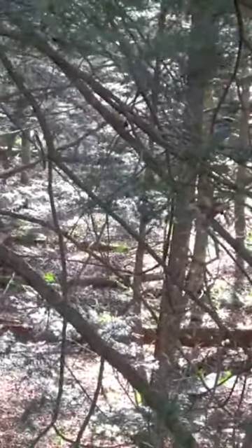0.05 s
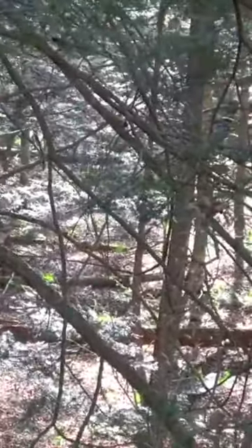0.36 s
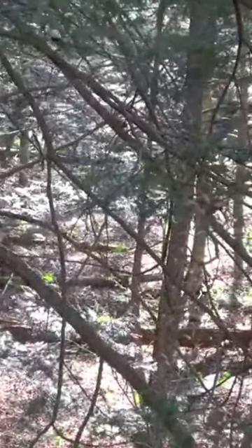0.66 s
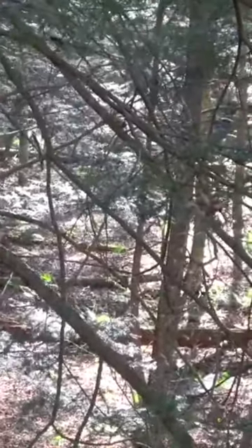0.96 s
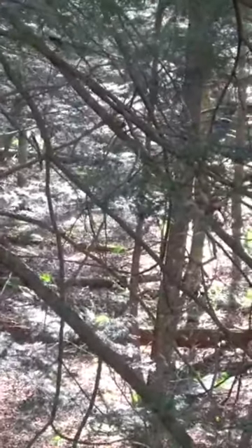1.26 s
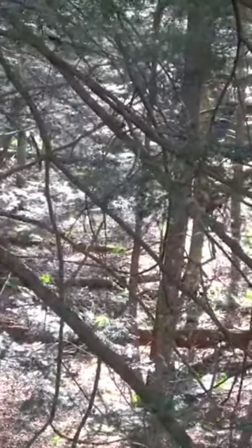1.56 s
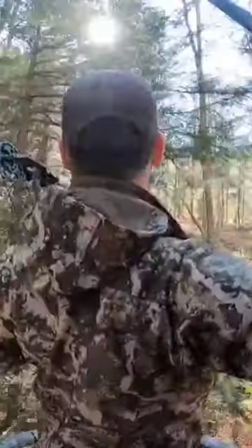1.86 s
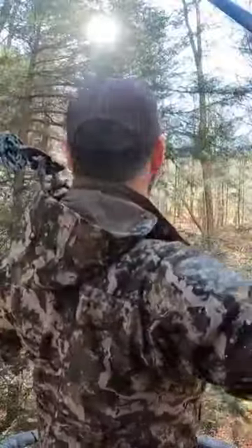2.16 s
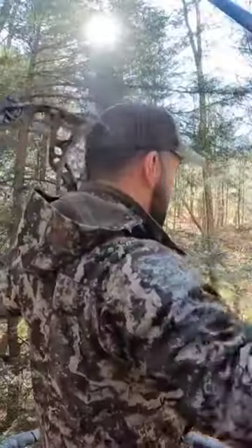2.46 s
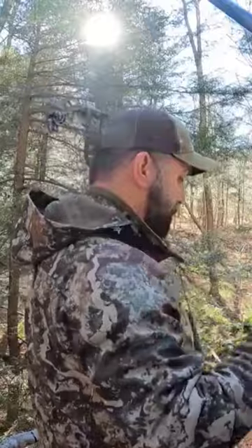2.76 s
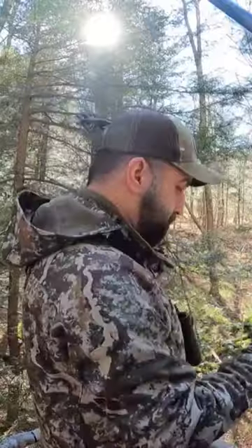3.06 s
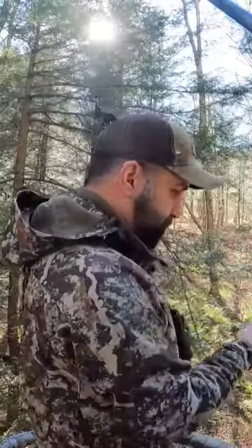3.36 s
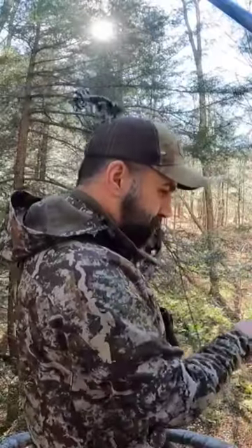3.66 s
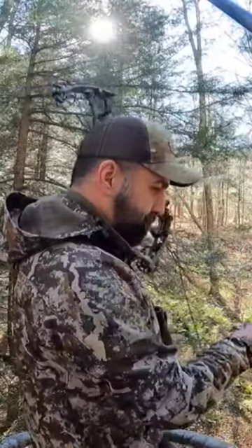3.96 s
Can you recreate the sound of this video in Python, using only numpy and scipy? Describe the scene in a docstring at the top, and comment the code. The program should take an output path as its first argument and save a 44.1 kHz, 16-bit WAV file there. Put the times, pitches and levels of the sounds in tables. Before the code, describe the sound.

Wind rumbles on the microphone throughout, over a soft hiss of conifers. Dry twigs tick nearby at first, then a stiff jacket rustles and gear clicks close by, ending in a brief clatter with dull bumps.

```python
"""A conifer wood, one microphone out in the wind. Gusts buffet it throughout, over the hiss of the
needles, and in the first two seconds dry twigs tick nearby. Close by, a man shifts in a stiff jacket
and something rubs with a faint whistle. After one thin high note his gear starts to click, and the
hiss cuts out for an instant now and then. Near the end the gear clatters with a gritty scrape and
dull bumps through the microphone mount, and the recorder's limiter ducks the background."""
import sys
import numpy as np
from scipy import signal
from scipy.io import wavfile
from scipy.ndimage import uniform_filter1d

SR = 44100
rng = np.random.default_rng(int(sys.argv[2]) if len(sys.argv) > 2 else 0)


def store_wav(level_fs):
    """Save 16-bit WAV to argv[1]."""
    pcm = np.round(np.clip(np.atleast_2d(level_fs), -1, 1) * 32767)
    wavfile.write(sys.argv[1], SR, pcm.T.astype(np.int16))


N = 176400
TIME = np.arange(N) / SR

# Strength of the breeze in the trees: time_s, level_db
BREEZE = [(0, -39.5), (.3, -40.5), (.43, -41.5), (.6, -40), (.72, -42.5), (.9, -38.5), (1.0, -43),
          (1.12, -45), (1.24, -42.5), (1.33, -47), (1.41, -42.5), (1.6, -41.5), (1.72, -41.5), (2.1, -43),
          (2.4, -43), (2.8, -41), (3.25, -42.5), (3.7, -43.5), (3.85, -44.5), (3.96, -49)]


def from_db(db):
    """Decibels to gain."""
    return 10 ** (np.asarray(db) / 20)


def rms_one(x):
    """Scale to rms 1."""
    return x / np.sqrt(np.mean(x ** 2) + 1e-20)


def level(rows):
    """Gain over time from rows of time_s, level_db."""
    return from_db(np.interp(TIME, *np.transpose(rows)))


def drift(rate_hz):
    """Smooth random wander of rms 1, mostly slower than rate_hz."""
    step, settle = 40, 2000
    pole = np.exp(-2 * np.pi * rate_hz * step / SR)
    white = rng.standard_normal(N // step + settle + 2)
    slow = signal.lfilter([1], [1, -2 * pole, pole * pole], white)[settle:]
    return np.interp(np.arange(N) / step, np.arange(len(slow)), rms_one(slow))


def lowpass(x, hz, order=2):
    """Roll off the highs above hz."""
    return signal.sosfilt(signal.butter(order, hz, fs=SR, output="sos"), x)


def shelf(x, treble_db):
    """Raise or lower the treble above 6 kHz."""
    dull = lowpass(x, 6000, order=1)
    return dull + from_db(treble_db) * (x - dull)


def noise(spectrum, flicker_db=0, flicker_hz=6.3):
    """Overlapping bands of noise, each flickering on its own by flicker_db; rms 1."""
    hz, db = np.transpose(spectrum)
    edges = np.r_[np.geomspace(2.5, 5000, 40), np.arange(6000, 17000, 1000)]
    white = rng.standard_normal((2, N + SR))
    out = 0
    for k, (low, high) in enumerate(zip(edges, edges[1:])):
        if high > hz[0] and low < hz[-1]:
            bandpass = signal.butter(2, [low, high], "band", fs=SR, output="sos")
            band = signal.sosfilt(bandpass, white[k % 2])[SR:]
            band_db = np.interp(np.log(low * high) / 2, np.log(hz), db)
            out = out + band * from_db(band_db + flicker_db * drift(flicker_hz))
    return rms_one(out)


def swell(middle_s, half_s):
    """A bell-shaped envelope, down to 1/e at half_s either side of its middle."""
    return np.exp(-np.minimum(((TIME - middle_s) / half_s) ** 2, 100))


def contact(modes, crack_db, crack_s, crack_hz, vary_db):
    """One blow: a short broad crack, and each mode ringing at a chance strength, a little off pitch."""
    t = TIME[:8192]
    crack = from_db(crack_db) * lowpass(rng.standard_normal(len(t)) * np.exp(-t / crack_s), crack_hz)
    detune = 1 + .006 * rng.standard_normal(len(modes))
    ring = 0
    for k, (hz, db, t60_s) in enumerate(modes):
        tone = (-1) ** k * np.sin(2 * np.pi * hz * detune[k] * t)
        ring = ring + from_db(db + vary_db * rng.normal() - 60 * t / t60_s) * tone
    return crack + ring


def strike(hits, modes, **touch):
    """Blows on one body, from rows of start_s, level_db and optionally treble_db, pitch_ratio."""
    out = np.zeros(N + SR)
    for start_s, level_db, *colour in hits:
        treble_db, pitch_ratio = colour + [0, 1][len(colour):]
        tuned = [(hz * pitch_ratio, db, t60_s) for hz, db, t60_s in modes]
        blow = shelf(contact(tuned, **touch), treble_db)
        start = int(start_s * SR)
        out[start:start + len(blow)] += from_db(level_db) * blow
    return out[:N]


def wind():
    """Gusts right on the microphone: big slow eddies rumble, smaller ones flutter above them."""
    # Strength of the big eddies: time_s, relative_db
    gusts = [(0, -23.5), (.2, -11.5), (.38, -29), (.55, -18.5), (.7, -22), (.92, -15), (1.05, -20),
             (1.2, -17), (1.4, -17.5), (1.55, -18), (1.75, -21), (1.95, -24.5), (2.15, -20), (2.35, -16.5),
             (2.55, -23.5), (2.67, -15), (2.9, -16), (3.15, -18.5), (3.4, -17.5), (3.65, -21), (3.95, -13),
             (4, -19.5)]
    # Strength of the small eddies: time_s, level_db
    buffets = [(0, -28), (.2, -30.5), (.42, -33), (.55, -32.5), (.68, -34), (.78, -24.5), (.93, -23.5),
               (1.03, -35), (1.25, -28.5), (1.55, -32), (1.9, -33.5), (2.05, -37), (2.2, -34),
               (2.35, -37.5), (2.55, -26.5), (2.75, -32), (3.05, -27.5), (3.4, -40), (3.55, -47),
               (3.75, -29.5), (3.86, -23), (4, -23)]
    # Spectrum of the big eddies: freq_hz, density_db
    rumble_spectrum = [(3, -5), (5, -1.5), (11, -0.5), (17, 1.5), (25, -6.5), (35, -14.5), (50, -22),
                       (70, -34.5), (110, -43)]
    # Spectrum of the small eddies: freq_hz, density_db
    flutter_spectrum = [(30, -3), (50, 2.5), (70, -3), (100, -12.5), (125, -14), (160, -18), (250, -33.5),
                        (400, -39), (900, -72)]
    rumble = noise(rumble_spectrum)
    flutter = noise(flutter_spectrum, flicker_db=3, flicker_hz=25.7)
    for eddies in (rumble, flutter):  # evened out, so the gusts and buffets set the strength
        eddies /= np.sqrt(uniform_filter1d(eddies ** 2, size=8000))
    return from_db(5.5) * level(gusts) * rumble + level(buffets) * flutter


def trees():
    """Air streams through the needles all around with a smooth, slightly wavering hiss."""
    # Spectrum of the hiss: freq_hz, density_db
    needle_spectrum = [(120, 7), (220, 8), (350, 4.5), (500, 3.5), (850, -0.5), (1250, -0.5), (2000, -5),
                       (4000, -6.5), (6300, -8), (8500, -12), (10000, -18), (12500, -22), (15000, -27)]
    waver = from_db(.6 * drift(40))
    hiss = noise(needle_spectrum, flicker_db=1.6, flicker_hz=30)
    return waver * level(BREEZE) * hiss


def crackle(ticks_per_s=120, level_db=-57):
    """Tiny ticks of dry needles and leaves, half sunk in the hiss and denser in a stronger breeze."""
    breeze = level(BREEZE)
    onsets = rng.random(N) < ticks_per_s * breeze / breeze.mean() / SR
    sizes = onsets * from_db(4 * np.minimum(rng.exponential(1, N), 2.5))
    pitches_hz = np.geomspace(3000, 9000, 10)
    pitch_index = rng.integers(0, len(pitches_hz), N)
    t = TIME[:600]
    ticks = 0
    for k, hz in enumerate(pitches_hz):
        ring = np.sin(2 * np.pi * hz * t) * np.exp(-t * hz / 2)
        ticks = ticks + signal.oaconvolve(sizes * (pitch_index == k), ring)[:N]
    return from_db(level_db) * rms_one(ticks)


def twigs():
    """Thin, dry twigs snap nearby and ring for a few milliseconds."""
    # Snaps: start_s, level_db, treble_db, pitch_ratio
    snaps = [(.366, -12, -26, 1.08), (.4143, -26.5, -3, 1.04), (.4573, -30.5, 5, 1.05),
             (.556, -30, -4, 0.66), (.585, -27, -6, .55), (.6445, -27.5, 6.5, 1.2), (1.066, -29, 2.5, 1.07),
             (1.197, -29.5, 0, 1.12), (1.402, -32, 4.5, 0.95), (1.6122, -16, -4, 1.05),
             (1.6875, -28, -7, 1.35), (1.7195, -20, -8, 1.21), (1.7205, -19, -4, 0.71),
             (1.7603, -30, 2, 1.15), (1.812, -31, 4, 1.3)]
    # Modes of a twig: pitch_hz, level_db, t60_s
    twig_modes = [(1760, -18.5, 0.017), (4480, -25, 0.0027), (5990, 0.5, 0.0031), (6930, 1.5, 0.002),
                  (7400, 1, 0.0025)]
    return strike(snaps, twig_modes, crack_db=-13, crack_s=.0008, crack_hz=12000, vary_db=1.5)


def jacket():
    """Stiff cloth rubs close to the microphone in grainy swishes, some brighter than others."""
    # Strokes of the cloth: middle_s, half_length_s, level_db, treble_db
    strokes = [(0.566, 0.038, -42.5, -8), (0.63, 0.012, -41.5, 2), (1.067, 0.0054, -42.5, 7),
               (1.203, 0.01, -49, 7), (2.242, 0.011, -46.5, 4.5), (2.37, 0.013, -46, 4),
               (2.539, 0.011, -34.5, 3.5), (3.153, 0.028, -38, -1), (3.266, 0.019, -45.5, 9.5),
               (3.376, 0.008, -35, 5.5), (3.399, .011, -36, 1.5), (3.424, 0.012, -40, 2),
               (3.48, 0.025, -37.5, -0.5), (3.574, 0.011, -35.5, -4), (3.67, 0.023, -48, 7),
               (3.736, 0.011, -39, -4)]
    # Spectrum of the rubbing cloth: freq_hz, density_db
    cloth_spectrum = [(300, 5), (900, -3.5), (1600, 4), (2400, 2.5), (5000, -4.5), (8500, -8),
                      (11000, -12.5), (15000, -23)]
    weave = rms_one(from_db(5 * np.minimum(drift(350), 2)))
    grain = weave * noise(cloth_spectrum, flicker_db=3.5, flicker_hz=14)
    return sum(from_db(db) * swell(middle_s, half_s) * shelf(grain, treble_db)
               for middle_s, half_s, db, treble_db in strokes)


def whistle(sag_hz_per_s=130, fade_db_per_s=5, ramp_s=.0097):
    """Something rubs with a faint, rough whistle or hum that sags and fades a little."""
    # Rubbing tones: start_s, length_s, pitch_hz, level_db
    rubs = [(.85, .08, 1440, -48), (1.12, 0.058, 375, -46), (1.195, 0.045, 370, -43),
            (2.485, 0.24, 1627, -49), (2.762, 0.22, 1660, -50.5)]
    out = 0
    for start_s, length_s, start_hz, db in rubs:
        age = np.clip(TIME - start_s, 0, None)
        jitter_hz, flicker_db = 60 * drift(140), 4 * drift(45)
        hz = start_hz - sag_hz_per_s * age + jitter_hz
        tone = np.sin(2 * np.pi * np.cumsum(hz) / SR)
        gate = np.clip(np.minimum(age, length_s - age) / ramp_s, 0, 1)
        out = out + gate * from_db(db - fade_db_per_s * age + flicker_db) * tone
    return out


def chirp():
    """One thin high note, perhaps a far bird."""
    hz = 8050 + 150 * drift(210)
    return from_db(-55) * swell(middle_s=2.09, half_s=.05) * np.sin(2 * np.pi * np.cumsum(hz) / SR)


def dropouts():
    """A gain that cuts the hiss out for an instant now and then."""
    # Gaps in the hiss: middle_s, length_s
    gaps = [(2.291, .007), (2.431, 0.0056), (2.651, 0.0052), (2.723, 0.0049), (3.947, 0.0024),
            (3.987, 0.0067)]
    gain = 1
    for middle_s, length_s in gaps:
        offset = np.abs(2 * (TIME - middle_s) / length_s)
        gain = gain * (1 - np.exp(-np.minimum(offset, 3) ** 6))
    return gain


def gear_clicks():
    """The man's gear knocks lightly, close to the microphone."""
    # Light knocks: start_s, level_db, treble_db
    knocks = [(2.36, -22, 0.5), (2.538, -28, 5), (2.8795, -16, -19.5), (3.6083, -26, -14.5),
              (3.6131, -11.5, 3), (3.6146, -28, 16), (3.6255, -28, -16), (3.7708, -19.5, -7),
              (3.7773, -18, -10), (3.8115, -26, -5)]
    # Modes of the gear: pitch_hz, level_db, t60_s
    gear_modes = [(820, -2.5, 0.0048), (1110, -3, 0.0061), (1690, -7, 0.012), (2970, -5.5, 0.006),
                  (3350, -8.5, 0.005), (5140, -4.5, 0.0019), (7500, -11, 0.0012)]
    return strike(knocks, gear_modes, crack_db=-11, crack_s=.001, crack_hz=12100, vary_db=1)


def mount_bumps():
    """Dull bumps reach the microphone through its mount."""
    # Bumps: start_s, level_db
    bumps = [(2.55, -35), (2.955, -33.5), (3.795, -23.5), (3.831, -21), (3.861, -19.5), (3.89, -22),
             (3.9, -24.5), (3.909, -17), (3.962, -31.5), (3.99, -31)]
    # Modes of the mount: pitch_hz, level_db, t60_s
    mount_modes = [(137, -0.5, 0.04), (218, 3, 0.049), (262, 0, 0.08), (685, -10.5, 0.052)]
    thuds = strike(bumps, mount_modes, crack_db=-16, crack_s=.003, crack_hz=600, vary_db=2.5)
    return lowpass(thuds, 720)


def gear_clatter():
    """Hard parts of the gear hit each other in one quick, bright run."""
    # Blows: start_s, level_db, treble_db, pitch_ratio
    blows = [(3.826, -15, -2, 1), (3.8325, -12.5, -4, 1.01), (3.8345, -9.5, -3, 1.02),
             (3.8372, -14, -8, 0.78), (3.8448, -21, -7, 0.87), (3.8515, -16, -11, 1), (3.8592, -21, 4, 1.2),
             (3.8654, -14, 4, 1.025), (3.8731, -7, -1, 0.985), (3.8843, -18, 10.5, 1.4),
             (3.8862, -16, -9, 1.1), (3.9138, -22, 5, 0.9)]
    # Modes of a buckle: pitch_hz, level_db, t60_s
    buckle_modes = [(1178, -20, 0.032), (2280, -12, .015), (3060, -18, 0.021), (3320, -19.5, 0.042),
                    (4880, -13.5, 0.014), (6410, -6.5, 0.011), (7400, -25, 0.007), (8610, -7, 0.013),
                    (10380, -13, 0.0076)]
    return strike(blows, buckle_modes, crack_db=-3, crack_s=.0018, crack_hz=14300, vary_db=5)


def gear_scrape(slips_per_s=1300, spread_db=3.5, slip_s=.001):
    """Gear sticks and slips: a dense run of tiny jerks, each a burst of friction noise."""
    # Scrapes among the blows: middle_s, half_length_s, level_db
    scrapes = [(3.834, 0.012, -28), (3.872, 0.014, -35.5), (3.893, 0.0056, -34), (3.902, 0.018, -30)]
    # Spectrum of the friction: freq_hz, density_db
    friction_spectrum = [(150, -8), (350, -2), (700, 2), (1300, 2.5), (2500, -8.5), (5000, -14),
                         (9000, -15), (15000, -42)]
    slips = (rng.random(N) < slips_per_s / SR) * from_db(spread_db * rng.standard_normal(N))
    energy = signal.lfilter([1], [1, -np.exp(-1 / (slip_s * SR))], slips ** 2 + 1e-9)
    rubbing = rms_one(np.sqrt(energy) * noise(friction_spectrum, flicker_db=3, flicker_hz=40))
    return rubbing * sum(from_db(db) * swell(middle_s, half_s) for middle_s, half_s, db in scrapes)


def trunk_echoes(x, level_db=-14, delay_s=.006, t60_s=.14, top_hz=2200):
    """Dull, quickly dying scatter from the trunks close by."""
    t = TIME[:8192]
    scatter = rng.standard_normal(len(t)) * from_db(-60 * t / t60_s) * (t > delay_s)
    tail = lowpass(scatter, top_hz)
    tail /= np.sqrt(np.sum(tail ** 2) * SR / 2 / top_hz)  # about unit gain below top_hz
    return from_db(level_db) * signal.oaconvolve(x, tail)[:N]


def scene():
    """The wood and the man as they reach the one microphone."""
    gear = gear_clicks() + gear_clatter() + mount_bumps() + gear_scrape()
    wood = wind() + dropouts() * (trees() + crackle()) + twigs() + chirp()
    man = jacket() + whistle() + gear + trunk_echoes(gear)
    return (wood + man)[None]


def record(dry):
    """The recorder's limiter ducks on peaks and recovers; the top is cut off steeply."""
    limit_db, release_db_per_s, cutoff_hz = -6.5, 78, 15500
    over_db = np.maximum(20 * np.log10(np.abs(dry[0]) + 1e-9) - limit_db, 0)
    release_db = release_db_per_s * TIME
    duck_db = np.maximum.accumulate(over_db + release_db) - release_db
    limited = dry * from_db(-uniform_filter1d(duck_db, size=200))
    return signal.sosfilt(signal.ellip(10, .2, 80, cutoff_hz, fs=SR, output="sos"), limited)


dry = scene()
out = record(dry)
store_wav(out)
```